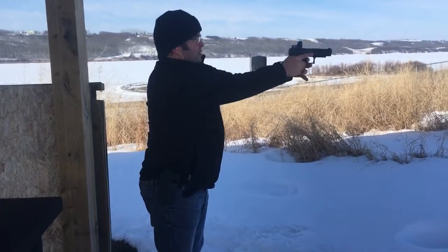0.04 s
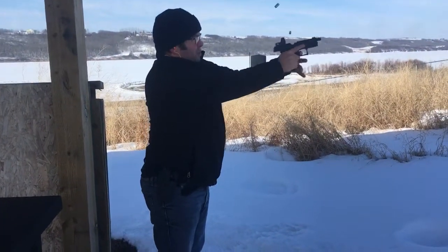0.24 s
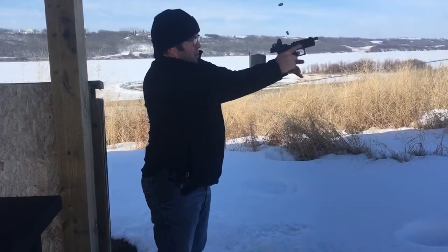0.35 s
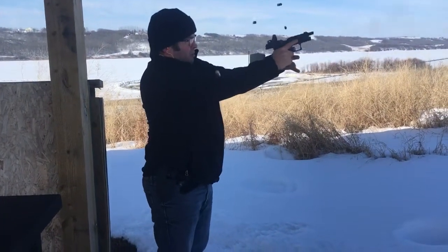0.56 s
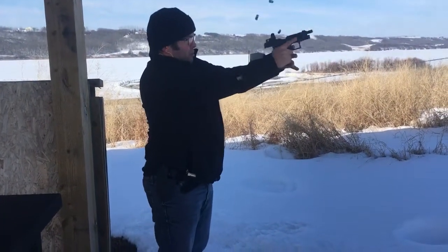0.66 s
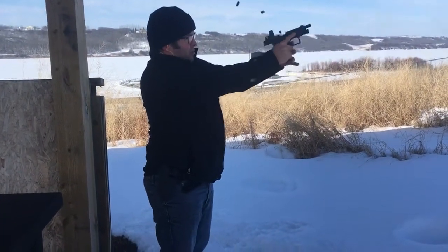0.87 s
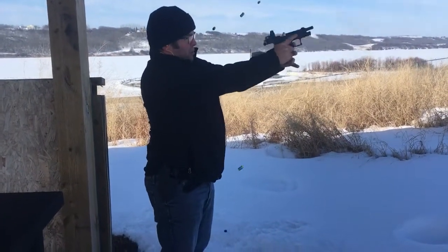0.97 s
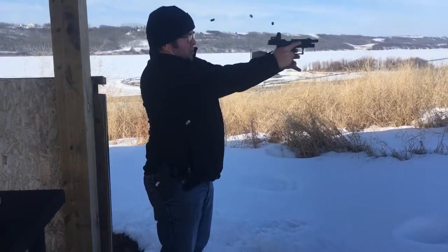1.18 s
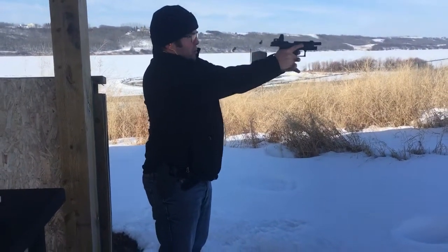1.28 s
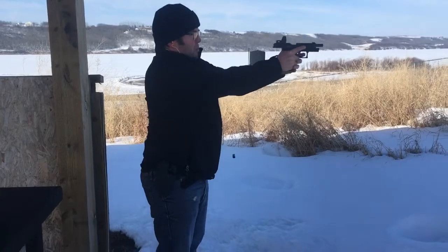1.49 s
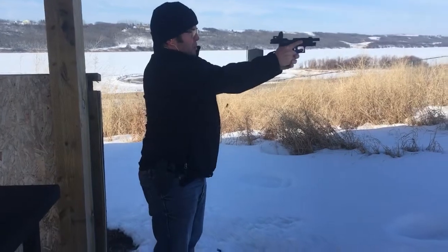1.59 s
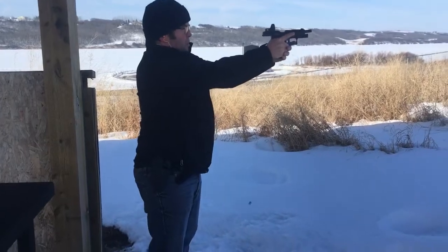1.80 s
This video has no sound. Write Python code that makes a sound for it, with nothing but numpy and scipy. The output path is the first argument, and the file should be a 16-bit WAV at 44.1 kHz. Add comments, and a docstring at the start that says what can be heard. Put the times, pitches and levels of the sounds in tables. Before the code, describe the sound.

A pistol fires ten fast, sharp, loud shots outdoors, followed by a brief echo.

```python
"""Ten fast pistol shots, a few metres from the microphone, beside a wooden shelter on a snowy range.
Each blast cracks, thumps and bounces off near surfaces; the shelter rings much the same every time,
a row of boards returns a falling note and a slap comes back from down range.
The valley rolls on behind, with light wind, ticks of gun handling and the tinkle of spent cases.
This close, the shots overload the microphone, which flattens their peaks."""
import sys
import numpy as np
from scipy import signal
from scipy.fft import irfft
from scipy.io import wavfile

SR = 44100
rng = np.random.default_rng(int(sys.argv[2]) if len(sys.argv) > 2 else 0)


def to_wav(sig):
    """Store sig (one row per channel, or 1-D mono) as 16-bit WAV at the path in sys.argv[1].

    Samples outside -1..1 are clipped; the rate is SR.
    """
    pcm = np.clip(np.atleast_2d(sig), -1, 1) * 32767
    pcm = np.round(pcm).astype(np.int16)
    wavfile.write(sys.argv[1], SR, pcm.T)  # frames by channels


N = 81585
SPAN = 16384  # samples in one event
AGE = np.arange(SPAN) / SR  # seconds since it began


def undb(db):
    """Decibels to gain."""
    return 10 ** (np.asarray(db) / 20)


def shaped(gain, size=SPAN):
    """Noise of rms 1 whose spectrum follows gain(log Hz)."""
    magnitude = gain(np.log(np.arange(size // 2 + 1) * SR / size + 1))
    wave = irfft(magnitude * np.exp(2j * np.pi * rng.random(len(magnitude))), size)
    return wave / (wave.std() + 1e-12)


def noise(spectrum, size=SPAN):
    """Noise of rms 1 coloured by rows of frequency_hz, relative_db."""
    hz, db = np.array(spectrum, float).T
    return shaped(lambda log_hz: undb(np.interp(log_hz, np.log(hz), db)), size)


def narrow_noise(hz, width):
    """Noise gathered around one frequency; the width is in log frequency."""
    return shaped(lambda log_hz: np.exp(-.5 * ((log_hz - np.log(hz)) / width) ** 2))


def enveloped(sound, envelope):
    """A noise under an envelope, with the envelope's energy."""
    burst = sound * envelope
    return burst * np.sqrt(np.sum(envelope ** 2) / (np.sum(burst ** 2) + 1e-18))


def fall(delay_s, decay_s, rise_s=.00055):
    """Fast rise, exponential decay."""
    since = np.maximum(AGE - delay_s, 0)
    return np.minimum(since / rise_s, 1) * np.exp(-np.maximum(since - rise_s, 0) / decay_s)


def bell(centre_s, width_s):
    """A smooth swell."""
    return np.exp(-.5 * ((AGE - centre_s) / width_s) ** 2)


def ring(hold_s, t60_s, build_s=.0093):
    """Build up, hold, die away."""
    return np.minimum(AGE / build_s, 1) * np.exp(-np.log(1000) * np.maximum(AGE - hold_s, 0) / t60_s)


def level_curve(points):
    """Gain over the whole scene from rows of time_s, level_db."""
    return undb(np.interp(np.arange(N) / SR, *np.array(points).T))


def add(out, sound, start_s):
    """Mix a sound in at a time."""
    first = int(start_s * SR)
    out[first:first + len(sound)] += sound[:max(len(out) - first, 0)]


# Faint air over the range: frequency_hz, relative_db
AIR_SPECTRUM = [(180, -25.5), (300, 6), (498, -6), (691, 1.5), (801, -14.5), (898, -2.5), (15000, -21)]
# Its fade: time_s, level_db
AIR_FADE = [(.2, -61.5), (.4, -83.5)]
def air():
    """The thin hiss of the open range."""
    return level_curve(AIR_FADE) * noise(AIR_SPECTRUM, N)


# Rumble at the microphone: frequency_hz, relative_db
WIND_SPECTRUM = [(20, -4.5), (65, 6.5), (120, -4), (250, -14.5), (600, -50.5)]
# One light gust: time_s, level_db
WIND_GUST = [(0, -47), (.1, -47.5), (.2, -40), (.4, -49.5), (1.3, -65)]
def wind():
    """Wind rumbles on the microphone and dies down."""
    return level_curve(WIND_GUST) * noise(WIND_SPECTRUM + [(2000, -94)], N)


# The far echo: frequency_hz, relative_db
VALLEY_SPECTRUM = [(25, -9), (60, -2.5), (90, -10), (130, 1.5), (190, -5), (330, -3), (480, -10.5),
                   (750, -7.5), (1000, -3.5), (1400, -9.5), (2200, -10.5), (3200, -19), (5000, -29),
                   (8000, -40), (15000, -48.5)]
# Its rise and fall: time_s, relative_db
VALLEY_ROLL = [(.25, -29), (.7, 16.5), (1.38, -1.5), (1.55, -3.5), (1.7, -3), (1.84, -0.5)]
def valley():
    """The valley's long echo, one swell of noise behind all the shots."""
    return undb(-48.5) * level_curve(VALLEY_ROLL) * noise(VALLEY_SPECTRUM, N)


# The echo from down range: frequency_hz, relative_db
SLAP_SPECTRUM = [(200, -18), (700, -6), (1400, 8.5), (2600, -2), (4500, -11.5), (8000, -24), (15000, -46)]
def down_range():
    """A slap from down range, the scatter behind it and a later low boom."""
    slap = enveloped(noise(SLAP_SPECTRUM), fall(.111, decay_s=.0035))
    scatter = enveloped(noise(SLAP_SPECTRUM), bell(.134, width_s=.019))
    boom = enveloped(narrow_noise(hz=127.5, width=.085), bell(.24, width_s=.04))
    return undb(-20) * slap + undb(-33.5) * scatter + undb(-53) * boom


# Small ticks at the firing point: start_s, level_db, pitch_hz
HANDLING_TICKS = [(0.0164, -52.5, 6350), (0.1278, -47.5, 3020), (0.132, -50.5, 6350), (1.4167, -51, 3940),
                  (1.76, -66, 4950), (1.812, -59, 4450)]
def ticks(out):
    """Gun handling and falling cases make short, broad ticks."""
    for start_s, level_db, pitch_hz in HANDLING_TICKS:
        add(out, undb(level_db) * narrow_noise(pitch_hz, width=.39) * fall(0, decay_s=.0031), start_s)


# Cases landing: start_s, level_db
CASE_LANDINGS = [(.387, -53), (.805, -53), (1.015, -52), (1.425, -71), (1.552, -68), (1.762, -72)]
def spent_cases(out):
    """Spent cases tinkle in a high, narrow band."""
    for start_s, level_db in CASE_LANDINGS:
        add(out, undb(level_db) * narrow_noise(hz=11600, width=.059) * fall(0, decay_s=.009), start_s)


# The burst ahead of the shots: frequency_hz, relative_db
BURST_SPECTRUM = [(60, 5.5), (150, -1), (300, -6.5), (700, -5.5), (1600, -2.5), (2400, -17), (6000, -22.5),
                  (15000, -39.5)]
def dull_burst():
    """A puff of noise, duller and quieter than a shot."""
    return undb(-18.5) * enveloped(noise(BURST_SPECTRUM), fall(0, decay_s=.021))


# Scatter from the surrounding ground and reeds: frequency_hz, relative_db
REED_SPECTRUM = [(300, -11), (1500, 3), (5500, -3.5), (8000, -18), (15000, -30)]
def reed_hiss():
    """Ground and reeds scatter the blast into a thin, lingering hiss."""
    return undb(-39) * noise(REED_SPECTRUM) * ring(0, t60_s=.55)


def boards(arrival_s=.047, pitch_hz=381.8, fall_s=.09):
    """Echoes from a row of boards arrive ever further apart and fuse into a falling note."""
    hz = pitch_hz * np.exp(-(AGE - arrival_s) / fall_s)
    return undb(-14.5) * bell(arrival_s, width_s=.008) * np.sin(2 * np.pi * np.cumsum(hz) / SR)


def low_drone(pitch_hz=133.7):
    """A low note rings on after each shot, longer than the shelter's modes."""
    return undb(-34) * np.sin(2 * np.pi * (pitch_hz * AGE + rng.random())) * ring(.021, t60_s=.3)


# The wooden shelter's middle and high modes: pitch_hz, relative_db
SHELTER_MID_MODES = [(258.4, -26.5), (387.6, -29.5), (586.8, -35.5), (866.7, -43.5), (979.8, -30),
                     (1066, -34), (1292, -36.5), (1362, -45.5), (1507, -38)]
SHELTER_HIGH_MODES = [(2519, -50), (2719, -43), (2966, -34.5)]
SHELTER_MODES = list(SHELTER_MID_MODES) + list(SHELTER_HIGH_MODES)
def shelter_modes(phases, tone_db, scatter_db=1.5):
    """The blast sets the modes ringing, each a little louder or softer from shot to shot."""
    modes = np.zeros(SPAN)
    for phase, (hz, db) in zip(phases, SHELTER_MODES):
        gain = undb(db + tone_db(hz) + scatter_db * rng.standard_normal())
        modes += gain * np.sin(2 * np.pi * hz * AGE + phase)
    return undb(10) * modes * ring(.021, t60_s=.13)


# Reverberation in the shelter: centre_hz, relative_db, hold_s, t60_s
SHELTER_BANDS = [(59, -30.5, .022, 0.36), (135.7, -33.5, 0.016, 0.47), (278, -22, 0.05, 0.16),
                 (582.3, -24, 0.037, 0.25), (1019, -23, 0.026, 0.17), (1767, -22.5, 0.022, .18),
                 (2780, -24, 0.025, 0.15), (4750, -28.5, 0.015, 0.2), (5750, -23, 0.02, .16),
                 (7870, -35.5, 0.025, 0.17), (14200, -36, .016, 0.16)]
def shelter_reverb(shared_bands, tone_db, shared_power=.87):
    """Dense reflections die away band by band, mostly alike for every shot."""
    bands = np.sqrt(shared_power) * shared_bands + np.sqrt(1 - shared_power) * band_noises()
    return sum(undb(db + tone_db(hz)) * enveloped(band, ring(hold_s, t60_s))
               for band, (hz, db, hold_s, t60_s) in zip(bands, SHELTER_BANDS))


def band_noises():
    """One noise for each of the shelter's overlapping bands."""
    centres = np.log([band[0] for band in SHELTER_BANDS])
    return np.array([shaped(lambda log_hz: np.sqrt(np.interp(log_hz, centres, weights)))
                     for weights in np.eye(len(centres))])


# The shelter's bass, middle and treble: centre_hz
TONE_CENTRES = [260, 1640, 6000]
def shelter(shared_bands, phases, balance_db):
    """The shelter answers with reverberation and modes, in one shot's tonal balance."""
    tone_db = lambda hz: np.interp(np.log(hz), np.log(TONE_CENTRES), balance_db)
    return shelter_reverb(shared_bands, tone_db) + shelter_modes(phases, tone_db)


# Single echoes from posts and walls close by: delay_s, level_db
WALL_ECHOES = [(.0255, -14), (.031, -28), (.0362, -13.5), (.042, -24.5), (.052, -22.5)]
# Their colour: frequency_hz, relative_db
WALL_SPECTRUM = [(200, -8), (600, 0), (1100, 0), (2500, -7), (6000, -18), (15000, -42)]
def near_walls(knock_hz=588):
    """The nearest wall answers with a hollow knock; single reflections follow."""
    knock = undb(-14.5) * bell(.0043, width_s=.0056) * np.sin(2 * np.pi * knock_hz * AGE)
    return knock + sum(undb(level_db) * enveloped(noise(WALL_SPECTRUM), fall(delay_s, decay_s=.0016))
                       for delay_s, level_db in WALL_ECHOES)


def thump(start_hz, strength_db, end_hz=40.7, sag_s=.017):
    """A swing of pressure that slows as it fades; stronger thumps last longer."""
    rise_s = .0085 * undb(strength_db)
    hz = end_hz + (start_hz - end_hz) / (1 + (AGE / sag_s) ** 4)
    envelope = AGE / rise_s * np.exp(1 - AGE / rise_s)
    return undb(strength_db - 11.5) * np.sin(2 * np.pi * np.cumsum(hz) / SR) * envelope


# The blast's bright crack and low punch: frequency_hz, relative_db
CRACK_SPECTRUM = [(200, -8), (700, -2), (1500, 8), (2800, 0.5), (4500, 3.5), (6500, -0.5), (10000, -8.5),
                  (16000, -14.5)]
PUNCH_SPECTRUM = [(70, -21.5), (160, 6), (300, -14), (600, 1), (1100, -1), (2000, -20), (5000, -33.5)]
# Paths to the microphone, direct first, then off near surfaces: delay_s, crack_db, punch_db
BLAST_PATHS = [(0, -5, -8.5), (.0052, -7.5, -5.5), (0.0128, -9.5, -11)]
def blast(shared_noises, direct_db, reflected_db):
    """Crack and punch arrive along each path, partly alike for every shot."""
    gains = undb([direct_db, reflected_db, reflected_db])
    noises = shared_noises + path_noises()
    sound = np.zeros(SPAN)
    for gain, (crack, punch), (delay_s, crack_db, punch_db) in zip(gains, noises, BLAST_PATHS):
        sound += gain * undb(crack_db) * enveloped(crack, fall(delay_s, decay_s=.0017))
        sound += undb(punch_db) * enveloped(punch, fall(delay_s, decay_s=.0034))
    return sound


def path_noises():
    """A crack noise and a punch noise for each path."""
    return np.array([(noise(CRACK_SPECTRUM), noise(PUNCH_SPECTRUM)) for _ in BLAST_PATHS])


# The shots from a few metres away, all levels relative: start_s, direct_crack_db, reflected_crack_db,
# thump_db, thump_hz, dip_db, shelter_bass_db, shelter_middle_db, shelter_treble_db, boards_db
PISTOL_SHOTS = [(.2324, 2.5, -8, 2.5, 89.6, -0.5, 3, -1, 2, 5.5),
                (0.3279, -0.5, 1, -9, 200, 1.5, -2, -15, -3.5, -4),
                (0.4282, 1.5, 2, 1.5, 127, -5, -0.5, 1, -3.5, 1.5),
                (0.5248, -3, -6, 0, 135, 5.5, -2, 1.5, -2.5, -1),
                (0.6287, 4, 6, -1, 154, -40, -2.5, 2, -1, 1.5),
                (0.7325, 1.5, -1, 0, 152.4, -5, -4, 2, -2, 0.5),
                (.8427, 2, 4, -2, 156, -8.5, -5, 3.5, -0.5, -8),
                (0.9426, 2.5, 0.5, -1.5, 238.5, -2, -3.5, 5, 1, -3),
                (1.05, 1.5, 2.5, 0, 203, -7.5, -5.5, 6, 0.5, -7),
                (1.1527, -1.5, 3, -3, 204, -3, -4, 4, -1, -6)]
def pistol_shots(out):
    """Each shot cracks and thumps, and the same surroundings answer it."""
    shared_bands = band_noises()
    phases = 2 * np.pi * rng.random(len(SHELTER_MODES))
    shared_noises, walls, far_echo = path_noises(), near_walls(), down_range()
    for shot in PISTOL_SHOTS:
        start_s, direct_db, reflected_db, thump_db, thump_hz, dip_db, *balance_db, boards_db = shot
        bang = blast(shared_noises, direct_db, reflected_db) + walls
        bang += shelter(shared_bands, phases, balance_db)
        bang *= undb(dip_db * bell(.011, width_s=.0027))  # the level dips briefly; in two shots it lifts
        tail = undb(boards_db) * boards() + low_drone() + reed_hiss() + far_echo
        add(out, bang + thump(thump_hz, thump_db) + tail, start_s)


def scene():
    """The range from beside the shelter, in mono: background, shots and small sounds."""
    out = valley() + wind() + air()
    pistol_shots(out)
    add(out, dull_burst(), start_s=.2093)
    ticks(out)
    spent_cases(out)
    return out[None]


def record(dry):
    """The overloaded microphone flattens the peaks, and the highest treble is cut."""
    ceiling, top_hz = .85, 16000
    lowpass = signal.ellip(8, .2, 70, top_hz, fs=SR, output="sos")
    return signal.sosfilt(lowpass, ceiling * np.tanh(dry / ceiling))


dry = scene()
out = record(dry)
to_wav(out)
```